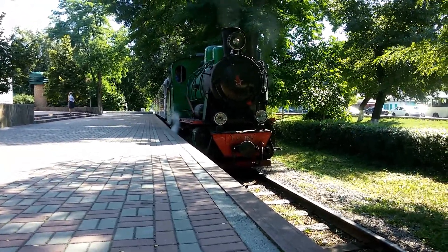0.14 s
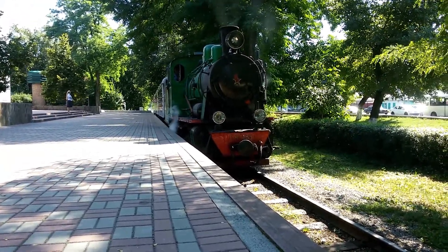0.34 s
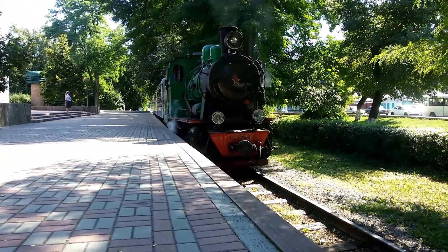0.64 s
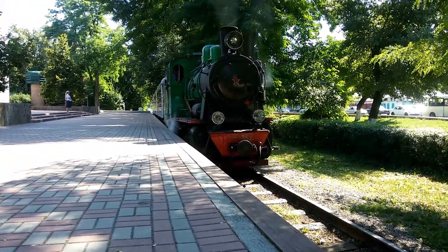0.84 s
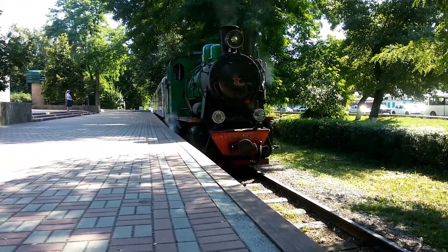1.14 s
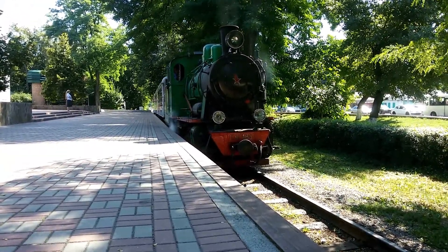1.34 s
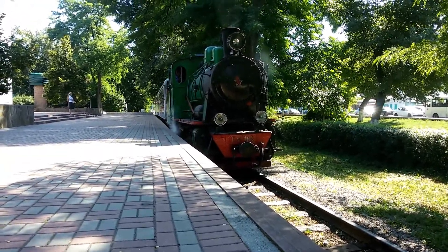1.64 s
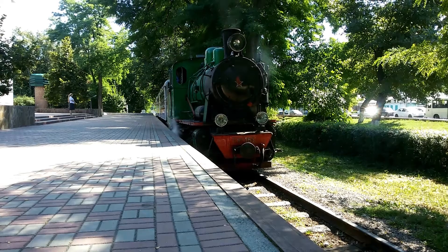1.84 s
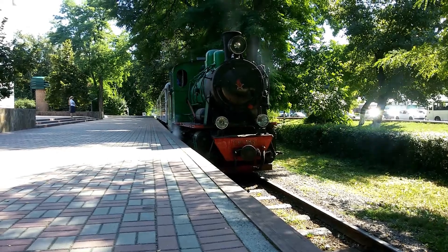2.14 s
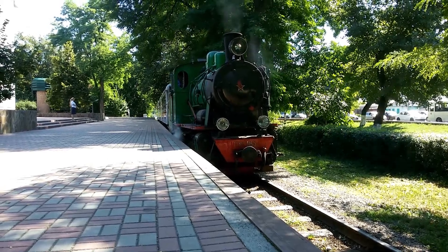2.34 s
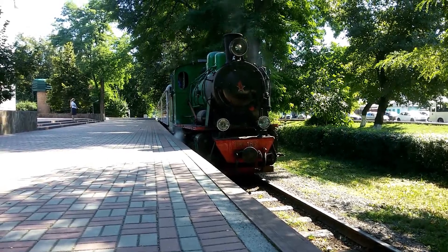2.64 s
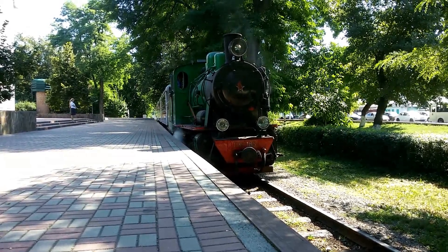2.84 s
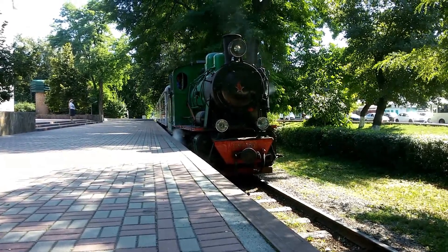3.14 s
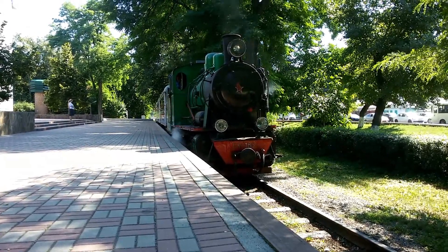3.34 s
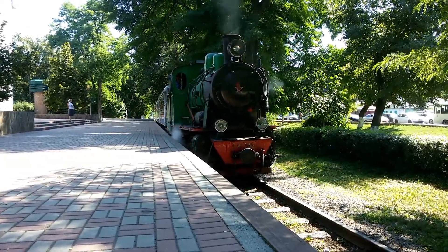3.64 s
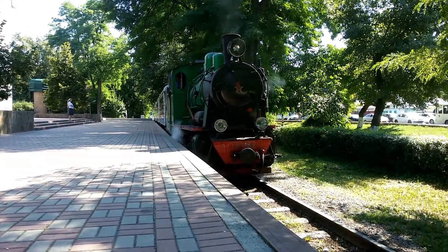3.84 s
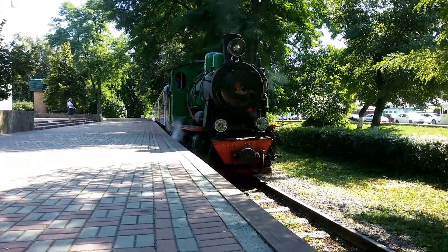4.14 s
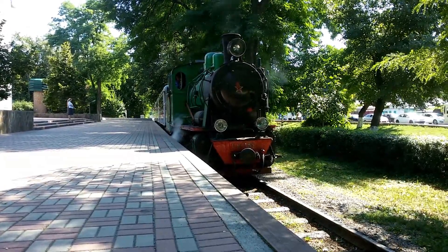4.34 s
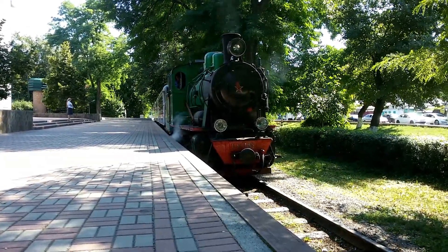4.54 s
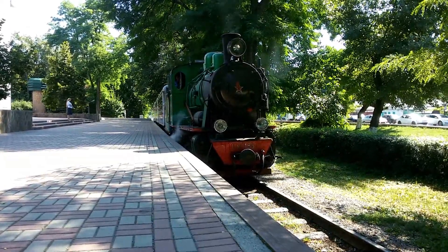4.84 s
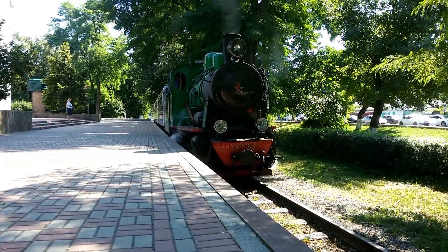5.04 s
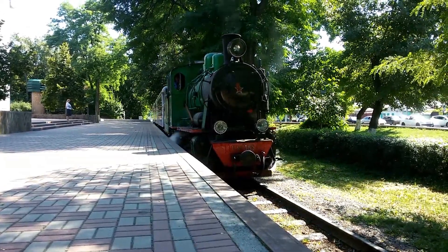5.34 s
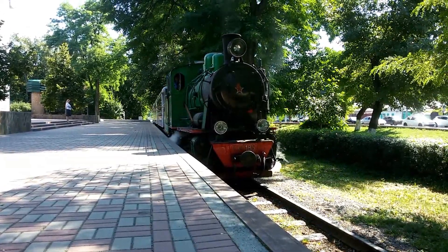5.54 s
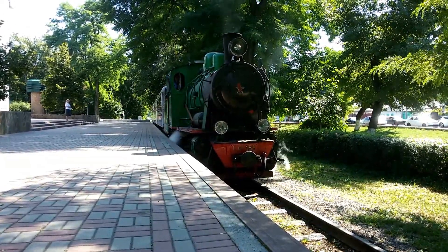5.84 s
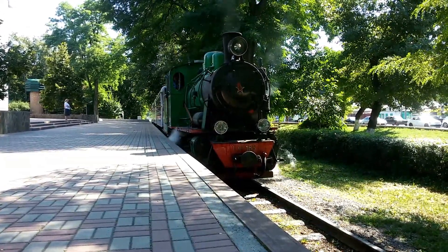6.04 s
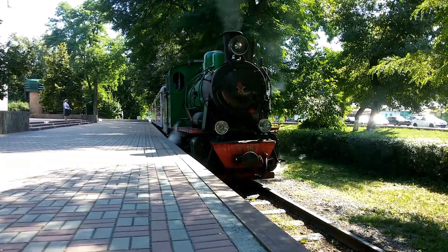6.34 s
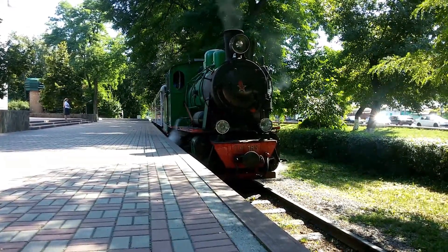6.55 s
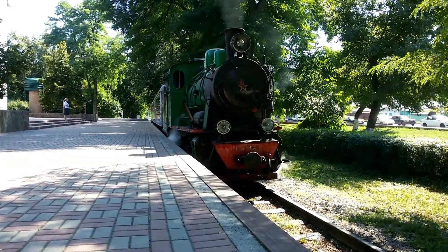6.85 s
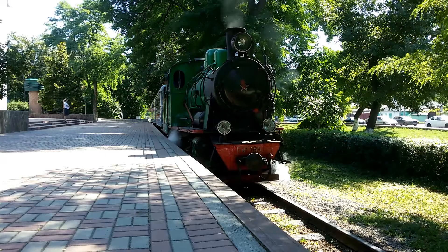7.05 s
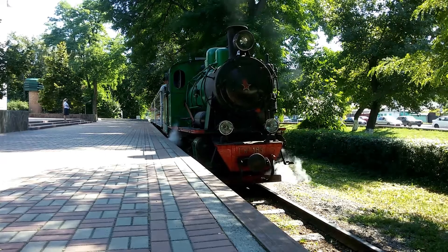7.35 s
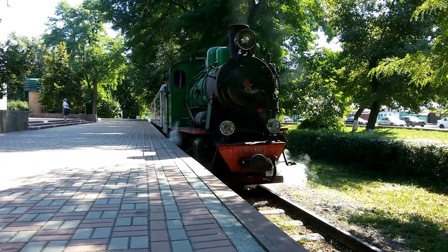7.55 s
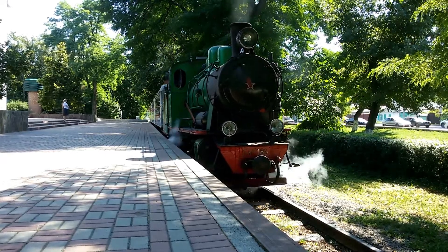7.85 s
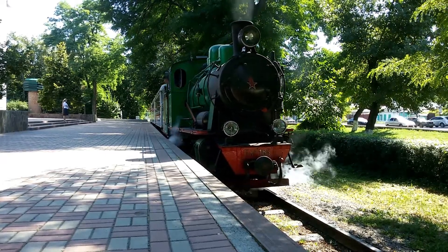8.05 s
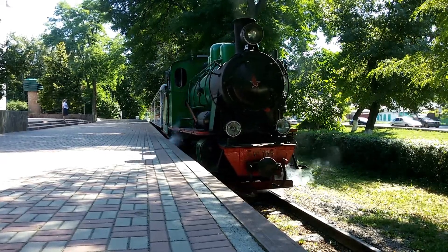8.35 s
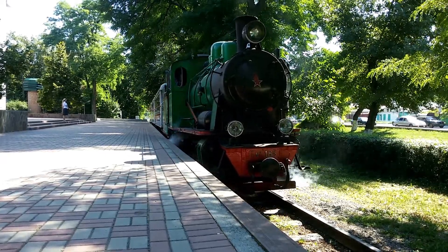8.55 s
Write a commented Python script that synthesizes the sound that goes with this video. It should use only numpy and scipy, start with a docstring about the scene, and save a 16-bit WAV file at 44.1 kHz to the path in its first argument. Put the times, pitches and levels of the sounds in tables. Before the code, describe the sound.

Slow, sharp bursts of steam with dull knocks from an idling locomotive, a passing street motor revving behind, then drain steam hissing loudly.

```python
"""A small steam locomotive stands while its air pump labours; a phone listens for almost nine seconds.
A puff is dying away and a street motor revs over leaking steam and rumble. Pump strokes swell in a low roar
of noise, with damped knocks and sharp noise puffs; the motor, made of gliding harmonics, fades out.
A rough drone joins two strong strokes, and the motor is briefly heard again between them.
Then the drain cocks open into a broad, bright hiss of noise, and a last knock and puff come through it."""
import sys
import numpy as np
from scipy import signal
from scipy.fft import rfft, irfft, next_fast_len
from scipy.io import wavfile
from scipy.ndimage import uniform_filter1d

SR = 44100
rng = np.random.default_rng(int(sys.argv[2]) if len(sys.argv) > 2 else 0)


def undo_db(level):
    """Turn decibels back into plain size, where 20 dB means ten times bigger."""
    steps = np.asarray(level, float) / 20
    return 10 ** steps


def to_wav(sig):
    """Store sig (one row per channel, or 1-D mono) as 16-bit WAV at the path in sys.argv[1].

    Samples outside -1..1 are clipped; the rate is SR.
    """
    pcm = np.clip(np.atleast_2d(sig), -1, 1) * 32767
    pcm = np.round(pcm).astype(np.int16)
    wavfile.write(sys.argv[1], SR, pcm.T)  # frames by channels


N = 384111
TIME = np.arange(N) / SR
SIZE = next_fast_len(N)
HZ = np.arange(SIZE // 2 + 1) * SR / SIZE + 1e-3  # the offset keeps log(HZ) finite

# All source levels stand ahead of the microphone; colours give only the balance of a noise.
# exhaust puffs, rates as heard at 5.7 kHz: (time [s], level [dB], blowing time [s],
# sag while blowing [dB/s], extra fall after the valve shuts [dB/s])
PUFFS = [(-.2, -4.5, 0.29, 25.5, 91), (.869, -5.5, .32, 20, 93), (2.347, -5.5, 0.34, 18.5, 71),
         (3.522, -4, 0.31, 26, 84), (5.074, -5, 0.32, 18, 61), (6.299, -5.5, .32, 19, 100),
         (8.153, -5, 0.37, 17, 60)]
# spectrum of the exhaust steam: (frequency [Hz], density [dB per Hz])
PUFF_COLOUR = [(150, -35), (235, -16), (380, -37), (750, -36.5), (1000, -24), (1350, -37), (2300, -30),
               (2650, -16.5), (3000, -21), (3610, -15), (4100, -16), (5800, -6), (8000, -10.5),
               (12300, -20), (14800, -35)]
# valve knocks, just ahead of the puffs: (time [s], thud gain [dB], metal ring gain [dB])
KNOCKS = [(.868, -28, -17.5), (2.344, -16, -24), (3.519, -20, -23), (5.070, -10, -22), (6.297, -22, -19),
          (8.142, -9, -26)]
# resonances of the pump, body thud first, then metal:
# (frequency [Hz], level relative to the knock's gain [dB], time to fall 60 dB [s])
KNOCK_MODES = [(234, 3, 0.031), (1024, -1.5, .07), (2720, -4, .06)]
# drain cocks, first ajar, then open: (time [s], level [dB])
COCKS = [(6.9, -60), (7.05, -35.5), (7.42, -29.5), (7.5, -20.5), (7.75, -14), (8.1, -14), (8.4, -18.5),
         (8.7, -13)]
# spectrum of the wet steam from the cocks: (frequency [Hz], density [dB per Hz])
COCK_COLOUR = [(400, -23.5), (1000, -20.5), (1800, -13), (2300, -21.5), (2900, -8.5), (3400, -11),
               (4300, -12), (5200, -10), (5950, -3.5), (7030, -8.5), (10000, -14), (14800, -20)]
# spells of pressure behind the leak: (start [s], end [s], level at the end at 5.7 kHz [dB])
PRESSURE = [(-0.71, .87, -28), (1.88, 3.56, -28.5), (4.5, 6.29, -28), (7.5, 8.4, -29)]
# spectrum of the leaking steam, before dulling: (frequency [Hz], density [dB per Hz])
LEAK_COLOUR = [(600, -45), (1500, -16.5), (2300, -26), (2650, -9), (3050, -13), (3610, -8.5), (4100, -11.5),
               (5720, -8.5), (7030, -10.5), (10000, -15.5), (14500, -33)]
# working strokes of the pump, levels before a common 4 dB lift at the source:
# (start [s], end [s], roar level at the end [dB], rumble level at the end [dB])
STROKES = [(-0.5, -0.19, -32, -33), (.5, 1.06, -34.5, -37), (1.88, 2.345, -29, -29), (3, 4, -36.5, -33),
           (4.5, 5, -30, -29), (6, 6.3, -31, -32), (7.22, 8.145, -28.5, -26.5)]
# spectrum of the pump roar and fire draught: (frequency [Hz], density [dB per Hz])
ROAR_COLOUR = [(120, -2), (220, 0.5), (420, -10.5), (560, -8), (760, -10), (950, -5), (1300, -11),
               (2100, -13), (3600, -17.5), (6000, -17.5), (11000, -43)]
# spectrum of the rumble of boiler and town: (frequency [Hz], density [dB per Hz])
RUMBLE_COLOUR = [(18, -45), (30, -20), (52, -4.5), (110, -2), (165, -5.5), (300, -21.5), (450, -28)]
# drone under two of the strong strokes, one list per stroke:
# (time [s], pitch [Hz], level [dB], octave level [dB])
DRONE = [
    [(4.55, 69.9, -40, -46), (4.85, 68.1, -28.5, -42), (5.12, 69, -27.5, -44)],
    [(7.0, 47.9, -36, -47), (7.5, 53, -39, -37), (7.85, 56.5, -33, -28), (8.17, 58.3, -30, -29)],
]
# street motor, one list each time it is heard: (time [s], firing rate [Hz], third harmonic level [dB])
MOTOR = [
    [(0, 56.3, -35), (.35, 50, -32.5), (.55, 44.95, -51), (1, 49.5, -40), (1.15, 50.5, -32), (1.4, 52, -35),
     (1.6, 57.5, -38), (1.8, 60, -47), (2, 64, -26.5), (2.25, 67, -28), (2.65, 61.96, -42),
     (2.95, 54.5, -32), (3.2, 48.5, -34.5), (3.45, 47.6, -33), (3.8, 41.95, -44)],
    [(5.8, 49, -44), (6.1, 51.27, -31), (6.75, 53.04, -32), (6.9, 53.1, -51)],
]
# motor harmonics whose mean level stays put: (multiple of the firing rate [1], level [dB])
MOTOR_ORDERS = [(2, -42.5), (4, -46), (5, -43.5), (6, -49)]
# resonances of the phone's port and case, ahead of a 2.5 dB trim:
# (frequency [Hz], width [Hz], lift [dB])
MICROPHONE = [(956, 265, 6), (4700, 360, 6.5), (5120, 250, 4.5), (5728, 500, 7.5)]


def puffs():
    """The valve snaps open with a pop, pressure sags, then the jet dies; slower steam loses its treble first."""
    rise_s, burst_db, pop_db, burst_s = 0.007, -0.5, 7.0, 0.026  # the rise is that at 5.7 kHz
    knee_s, treble_fade = 0.04, 0.51
    start, db, blow_s, sag, fall = np.transpose(PUFFS)[:, :, None]
    coarse = TIME[::16]
    t = np.maximum(coarse - start, 0)
    # a soft knee leads from the sag into the faster fall
    drop_db = sag * t + fall * knee_s * np.logaddexp(0, (t - blow_s) / knee_s)

    def level_db(hz):
        # the treble builds as the jet gathers speed
        opening = 1 - np.exp(-t / (rise_s * (hz / 5700) ** 0.85))
        # the first slug of steam pops below the treble
        pop = burst_db + pop_db / (1 + (hz / 2200) ** 2)
        first_db = pop * np.exp(-t / burst_s)
        fade_db = drop_db * (hz / 5700) ** treble_fade
        power = np.sum((opening * undo_db(db + first_db - fade_db)) ** 2, axis=0)
        return np.interp(TIME, coarse, 10 * np.log10(power + 1e-14))

    return turbulence(PUFF_COLOUR, level_db, flicker_db=1.2, flicker_rate=25)


def knocks():
    """A short push thuds in the pump body and rings its metal, in a mix that differs from stroke to stroke."""
    t = TIME[:SR // 10]
    onset = 1 - np.exp(-t / 0.0004)
    modes = []
    for hz, db, t60 in KNOCK_MODES:
        decay = 1000 ** (-t / t60)
        modes.append(onset * undo_db(db) * np.cos(2 * np.pi * hz * t) * decay)
    thud, ring = modes[0], sum(modes[1:])
    out = np.zeros(N + len(t))
    for start, thud_db, ring_db in KNOCKS:
        i = int(start * SR)
        out[i:i + len(t)] += undo_db(thud_db) * thud + undo_db(ring_db) * ring
    return out[:N]


def cocks():
    """Wet steam is blown out beside the front wheels as broad, bright turbulence."""
    db = np.interp(TIME, *np.transpose(COCKS), left=-120)
    return turbulence(COCK_COLOUR, lambda hz: db, flicker_db=1.25, flicker_rate=10)


def leak():
    """Steam escapes all along, louder under pressure; a weaker jet is duller as well as softer."""
    dulling = 0.21  # dB per octave for each dB of level
    db = swell(PRESSURE, idle_db=-41, rise_s=0.4, climb_db_s=2.5, fall_db_s=15)

    def level_db(hz):
        return db + dulling * (db + 19) * np.log2(hz / 5700)

    return turbulence(LEAK_COLOUR, level_db, flicker_db=0.65, flicker_rate=12)


def roar():
    """The pump's working stroke and the fire draught roar, with the rumble of boiler and town beneath."""
    lift_db, rise_s = 4.0, 0.34
    start, end, roar_db, rumble_db = np.transpose(STROKES)
    roar_spells = np.transpose([start, end, roar_db])
    rumble_spells = np.transpose([start, end, rumble_db])
    roar_level = lift_db + swell(roar_spells, -39.5, rise_s, climb_db_s=1.4, fall_db_s=16.5)
    rumble_level = lift_db + swell(rumble_spells, -36.5, rise_s, climb_db_s=1.7, fall_db_s=90)
    mids = turbulence(ROAR_COLOUR, lambda hz: roar_level, flicker_db=1.92, flicker_rate=12)
    lows = turbulence(RUMBLE_COLOUR, lambda hz: rumble_level, flicker_db=0.5, flicker_rate=6)
    return mids + lows


def drone():
    """A low tone and its octave, roughened by an unsteady pitch and level."""
    return harmonics(DRONE, own_orders=(1, 2), steady_orders=[], wobble=0.015, waver_db=3.5)


def motor():
    """Firing harmonics carry over the hedge as the motor revs; the third stands out and swells."""
    return harmonics(MOTOR, own_orders=(3,), steady_orders=MOTOR_ORDERS, wobble=0.00702, waver_db=2.5)


def walk(rate):
    """Smooth random drift of spread near 1: random levels held 1 / rate seconds and slewed twice."""
    k = int(SR / rate)
    held = np.repeat(rng.standard_normal(N // k + 1), k)
    slewed = uniform_filter1d(uniform_filter1d(held, k), k)
    return 1.3 * slewed[:N]


def turbulence(colour, level_db, flicker_db, flicker_rate):
    """Coloured noise of rms 1 is split into octave bands; each has its level in time and flickers alone."""
    hz, db = np.transpose(colour)
    colour_db = np.interp(np.log(HZ), np.log(hz), db, left=-120, right=-120)
    noise = rfft(rng.standard_normal(SIZE)) * undo_db(colour_db)
    noise = noise / np.std(irfft(noise, SIZE))
    out = np.zeros(N)
    for centre_hz in 20 * 2.0 ** np.arange(11):
        if hz[0] / 2 < centre_hz < hz[-1] * 2:
            octaves_away = np.clip(np.log2(HZ / centre_hz), -1, 1)
            share = np.cos(np.pi / 2 * octaves_away) ** 2  # neighbouring bands add up to 1
            band = irfft(noise * share, SIZE)[:N]
            out += band * undo_db(level_db(centre_hz) + flicker_db * walk(flicker_rate))
    return out


def swell(spells, idle_db, rise_s, climb_db_s, fall_db_s):
    """Level in dB: an idle floor plus spells that open, climb slowly to their end and then fall."""
    start, end, db = np.asarray(spells).T[:, :, None]
    coarse = TIME[::64]
    opening = np.clip((coarse - start) / rise_s, 0, 1)
    climb_db = climb_db_s * np.maximum(end - coarse, 0)
    fall_db = fall_db_s * np.maximum(coarse - end, 0)
    power = undo_db(idle_db) ** 2 + np.sum((opening * undo_db(db - climb_db - fall_db)) ** 2, axis=0)
    return np.interp(TIME, coarse, 10 * np.log10(power))


def harmonics(runs, own_orders, steady_orders, wobble, waver_db):
    """Sines on multiples of a gliding, wobbling pitch, each wavering in level on its own."""
    out = np.zeros(N)
    for run in runs:
        s, hz, *own_db = np.transpose(run)
        since_start = TIME - s[0] + (s[0] == 0)  # a run from time 0 is already sounding
        fade = np.clip(np.minimum(since_start, s[-1] - TIME) / 0.064, 0, 1)
        pitch = np.interp(TIME, s, hz) * (1 + wobble * walk(15))
        phase = 2 * np.pi * np.cumsum(pitch) / SR
        levels = [(k, np.interp(TIME, s, db)) for k, db in zip(own_orders, own_db)]
        for k, db in levels + steady_orders:
            tone = np.sqrt(2) * np.sin(k * phase + k)  # rms 1
            out += fade * undo_db(db + waver_db * walk(8)) * tone
    return out


def scene():
    """One microphone feeds both channels."""
    mono = puffs() + knocks() + cocks() + leak() + roar() + drone() + motor()
    return np.array([mono, mono])


def band_limit(x):
    """A steep low-pass at the top of the band."""
    return signal.sosfilt(signal.butter(12, 14580, fs=SR, output="sos"), x)


def record(dry):
    """The phone's port and case lift a few bands; gain control ducks loud sound; peaks are rounded."""
    knee_db, ratio, follow_s = -16.5, 2.14, 0.013
    lift_db = sum(db / (1 + (2 * (HZ - hz) / width) ** 2) for hz, width, db in MICROPHONE)
    x = irfft(rfft(dry, SIZE) * undo_db(lift_db - 2.5), SIZE)[:, :N]
    # the gain follows the smoothed power of the sound
    keep = np.exp(-1 / (follow_s * SR))
    initial_power = np.mean(x[0, :SR // 20] ** 2)
    power = signal.lfilter([1 - keep], [1, -keep], x[0] ** 2, zi=[initial_power])[0]
    gain = (1 + power / undo_db(knee_db) ** 2) ** ((1 / ratio - 1) / 2)
    x = x * gain
    rounded = x / (1 + np.abs(x) ** 4) ** 0.25
    return band_limit(rounded)


dry = scene()
out = record(dry)
to_wav(out)
```